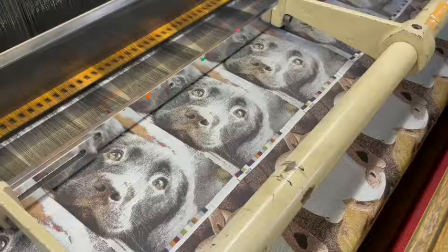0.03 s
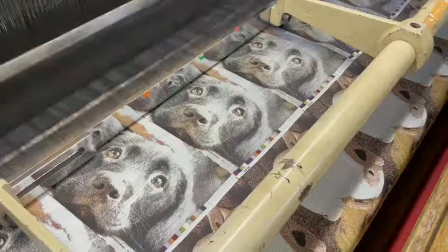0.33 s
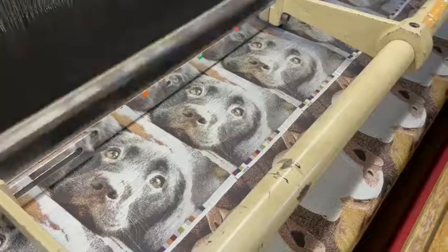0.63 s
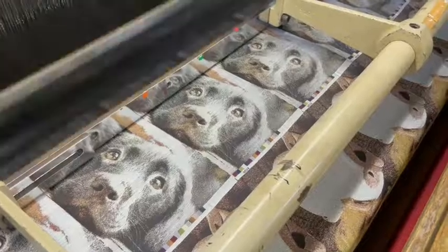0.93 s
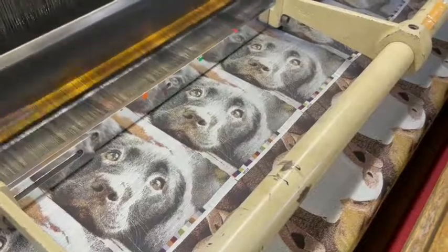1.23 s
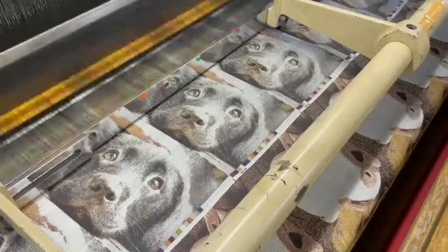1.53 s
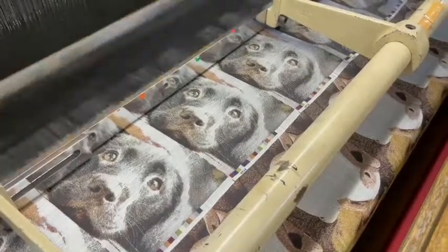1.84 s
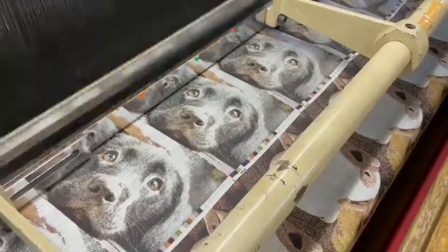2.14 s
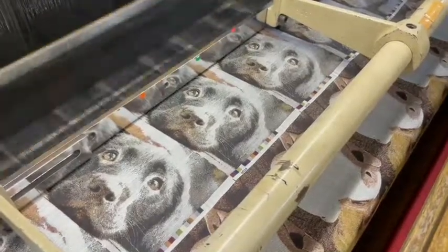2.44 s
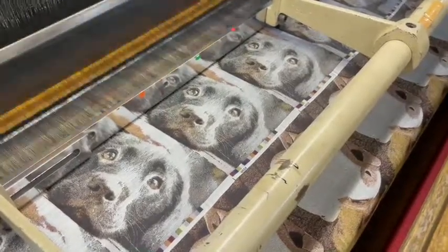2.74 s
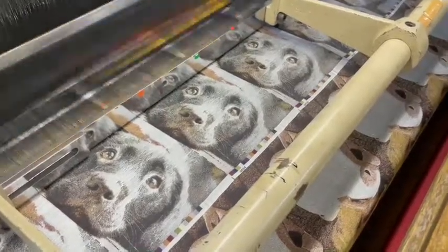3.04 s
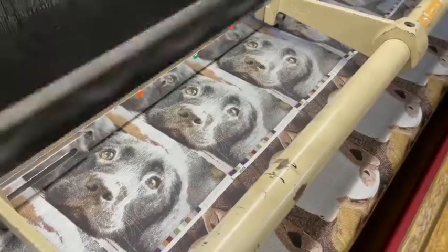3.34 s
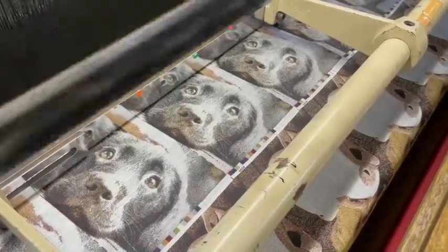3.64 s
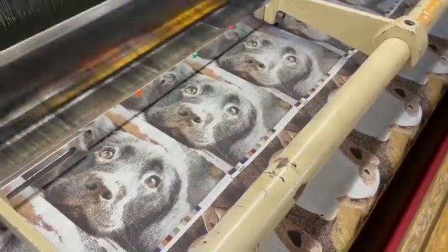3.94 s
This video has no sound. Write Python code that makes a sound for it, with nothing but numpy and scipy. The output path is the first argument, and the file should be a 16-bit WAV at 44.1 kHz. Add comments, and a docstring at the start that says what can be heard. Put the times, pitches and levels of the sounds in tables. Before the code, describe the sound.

Close up in a workshop full of machines, a weaving loom clashes and thumps in a quick, even rhythm amid rattling parts and brief whines. A second loom pounds, swishes and ticks, drifting in and out of step.

```python
"""A workshop full of machines, with a power loom weaving close by.
On every pick its drive whirrs up, the reed beats the weft home with a bright metallic clash and the
frame thumps. Heddles rattle, levers and cams knock, and now and then the drive whines.
A slightly slower loom nearby pounds, swishes and ticks, drifting in and out of step,
over the steady din of the hall."""
import sys
import numpy as np
from scipy import signal
from scipy.fft import rfft, irfft
from scipy.io import wavfile

SR = 44100
rng = np.random.default_rng(int(sys.argv[2]) if len(sys.argv) > 2 else 0)


def transcribe(signal):
    """Save signal, clipped to [-1, 1], as a 16-bit WAV file at the path in sys.argv[1]."""
    frames = np.atleast_2d(signal).T
    limited = np.clip(frames, -1, 1)
    pcm = np.round(limited * 32767).astype(np.int16)
    wavfile.write(sys.argv[1], SR, pcm)


N = 176400
T = np.arange(N) / SR
HZ = np.maximum(np.arange(N // 2 + 1) * SR / N, 1)


def from_db(db):
    return 10 ** (np.asarray(db) / 20)


def rms_one(x):
    return x / np.sqrt(np.mean(x ** 2) + 1e-20)


def per_hz(points):
    """A curve of (freq_hz, value) points, read on a log-frequency axis."""
    hz, value = np.transpose(points)
    return np.interp(np.log(HZ), np.log(np.maximum(hz, 1)), value)


def white():
    """Two unrelated noises: mid and side."""
    return rng.standard_normal((2, N))


def mid_only(x):
    """A sound that reaches both microphones along one path."""
    return np.array([x, np.zeros(N)])


def colour(x, eq):
    """Shape a signal with an EQ curve; rms 1."""
    return rms_one(irfft(rfft(x) * from_db(per_hz(eq)), N))


def resonance(hz, width_hz):
    """Response of a rounded peak; rms 1."""
    return rms_one(1 / (1 + ((HZ - hz) / width_hz) ** 2))


def drift(hz):
    """A random wobble, mostly slower than hz; rms 1."""
    return rms_one(irfft(rfft(rng.standard_normal(N)) / (1 + (HZ / hz) ** 2), N))


def strokes(times, levels_db, rise_s, hold_s, fall_s):
    """Envelope of strokes: a rounded rise up to each time, a hold and a dying fall; powers add."""
    power = np.zeros(N)
    for s, gain in zip(times, from_db(levels_db) * np.ones(len(times))):
        rise = (np.minimum(T - s, 0) / rise_s) ** 2
        fall = np.maximum(T - s - hold_s, 0) / fall_s
        power += (gain * np.exp(-np.minimum(rise + fall, 20))) ** 2
    return np.sqrt(power)


def clicks(per_s, spread_db):
    """Random contacts of uneven strength."""
    return (rng.random(N) < per_s / SR) * from_db(spread_db * np.minimum(rng.exponential(1, N), 4))


def ring(x, hz, t60_s):
    """A unit click sets a sine of height 1 ringing."""
    radius, angle = np.exp(-np.log(1000) / (t60_s * SR)), 2 * np.pi * hz / SR
    return signal.lfilter([0, np.sin(angle)], [1, -2 * radius * np.cos(angle), radius ** 2], x + 1e-18)


def struck(times, db, modes, scatter_s):
    """Each blow strikes each mode with a slightly different strength and timing."""
    out = np.zeros(N)
    for hz, mode_db, t60_s in modes:
        timing, force = rng.uniform(-0.96, 1, (len(times), 2)).T
        onsets = np.clip((times + scatter_s * timing) * SR, 0, N - 1).astype(int)
        blows = np.zeros(N)
        blows[onsets] = from_db(db + mode_db + 2 * force)
        out += ring(blows, hz, t60_s)
    return out


# Tone of the machine bed: freq_hz, gain_db
DIN_EQ = [(20, -21.0), (30, -4), (42, 3), (65, 1.5), (88, -10), (115, -3.5), (165, -4), (260, -3.5),
          (400, -7.5), (750, -5), (1150, -6), (1800, -11), (2550, -14.5), (3000, -15.5), (3600, -12.5),
          (4380, -10), (4700, -13), (4980, -12.5), (5550, -15), (6650, -12.5), (7400, -16.5), (8700, -37),
          (10500, -15.5), (12000, -20.5), (13200, -19.5), (14500, -27), (15800, -34)]
# Steel singing in the bed: pitch_hz, width_hz, level_db
STEEL_RINGS = [(99.7, 5.7, -44), (165.3, 18, -43), (2560, 100, -46), (3860, 35, -43), (4280, 140, -44),
               (4960, 66, -43), (6820, 130, -41.5), (15430, 120, -52)]

def hall():
    """Many machines blur into a fluttering din, and their shaking keeps steel parts ringing."""
    flutter_db = drift(hz=38.7)
    din = from_db(-24 + flutter_db) * colour(white(), DIN_EQ)
    shaking = rfft(white())
    steel = sum(from_db(db) * resonance(hz, width_hz) for hz, width_hz, db in STEEL_RINGS)
    return din + irfft(shaking * steel, N)


# Clatter of levers and cams: pitch_hz, rms_db
LINKAGE_PARTS = [(237, -51.5), (409, -49.5), (743, -43.5), (818, -43.5), (1098, -38.5), (1453, -43.5),
                 (1540, -49.5), (1880, -41), (1949, -46.5), (2304, -45), (2570, -43), (4393, -52),
                 (5373, -47)]
# The one lever that stands out: pitch_hz, gain_db, t60_s
LEVER_RING = [(1120, 7, 0.12), (1240, -1, .15), (1380, -9, .1)]

def linkage():
    """Levers and cams knock at random, each knock ringing about half the parts; one lever clanks out."""
    knocks = clicks(per_s=80, spread_db=1.2)
    clatter = np.zeros((2, N))
    for hz, db in LINKAGE_PARTS:
        blows = knocks * (rng.random(N) < .5) * white()
        clatter += from_db(db) * rms_one(ring(blows, hz, t60_s=.11))
    lever = struck(times=np.array([.977]), db=-23.5, modes=LEVER_RING, scatter_s=.00192)
    return clatter + mid_only(lever)


# The near loom's rhythm, with a fader per layer, for the drive here and the beat-up below:
# hit_s, clash_db, ping_db, clank_db, thump_db, whirr_db
PICKS = [(.1005,-18,-36,-31.5,-37,-27), (.446,-13.5,-27,-27,-40,-29), (.794,-16.5,-28,-27.5,-27,-27),
         (1.1416,-14.5,-22,-24,-29,-27), (1.4842,-16,-30,-32,-33,-29), (1.8342,-15,-32,-26.5,-24,-26),
         (2.181,-19,-40,-31,-32,-26), (2.526,-16,-25,-29,-27,-31), (2.875,-18.5,-34,-30,-37,-30),
         (3.2205,-17.5,-24,-26,-27,-31), (3.566,-19,-28,-26.5,-27,-28.5), (3.91,-19,-24,-29,-28,-26.5)]
# Tone of the whirr and of the rattle: freq_hz, gain_db
WHIRR_EQ = [(100, -18), (300, -9), (600, 4), (1150, 1), (1800, -6), (3000, -16), (4500, -1), (7000, -26),
            (13000, -8.5), (16000, -29)]
RATTLE_EQ = [(200, -8), (700, 8), (1500, 5.5), (3000, -6.5), (4400, -0.5), (5600, -9.5), (6700, 5),
             (9000, -31), (13000, -0.5), (16000, -16)]

def drive():
    """The drive whirrs up just before each beat, and heddles and chains rattle harder with it."""
    hit_s, *_, whirr_db = np.transpose(PICKS)
    swell = strokes(hit_s - .024, whirr_db, rise_s=.091, hold_s=0, fall_s=.059)
    contacts = clicks(per_s=420, spread_db=2)
    contact_fall_s = .0016
    contact_power = signal.lfilter([1], [1, -np.exp(-1 / (contact_fall_s * SR))], contacts ** 2 + 1e-18)
    shaking = 1 + .42 * swell / swell.max()
    rattle = colour(white() * np.sqrt(contact_power) * shaking, RATTLE_EQ)
    return swell * colour(white(), WHIRR_EQ) + from_db(-32) * rattle


def reed_blows(hit_s, db):
    """Envelope of the reed's hits, each with a softer rebound and a tail."""
    rebound_s, rebound_db = hit_s + .018, db - 7
    hits = strokes(np.r_[hit_s, rebound_s], np.r_[db, rebound_db], rise_s=.004, hold_s=.0048, fall_s=.012)
    tail = strokes(hit_s, db - 5, rise_s=.004, hold_s=0, fall_s=.034)
    return np.hypot(hits, tail)


# Tone of the bright clash and of the midrange clank: freq_hz, gain_db
CLASH_EQ = [(300, -17), (1500, -8.5), (3100, -21), (4500, -11), (6000, -2.5), (9000, -3), (11500, 1.5),
            (12700, -16), (14300, -1), (15700, -9)]
CLANK_EQ = [(150, -23), (400, -2.5), (1000, -8), (1700, -0.5), (2300, 0), (3000, -6), (4500, -16),
            (7000, -8), (10000, -29)]
# Ring-out of the reed, the sley (the bar that carries it) and the frame: pitch_hz, gain_db, t60_s
REED_RING = [(8200, -3, 0.13), (10500, -14, .05), (15430, -19, .06)]
SLEY_RING = [(1880, -12, .12), (2080, -1, .1), (2256, -5, 0.15), (2430, -12, .15)]
FRAME_RING = [(44.4, -6, .35), (53, -2.5, 0.6), (101, -9, .15), (169, -4.5, 0.17)]

def beat_up():
    """The reed hits the cloth: its wires clash and ping, the sley clanks and the frame thumps."""
    hit_s, clash_db, ping_db, clank_db, thump_db, _ = np.transpose(PICKS)
    wires = colour(white() * clicks(per_s=9000, spread_db=-2.5), CLASH_EQ)
    clash = from_db(-6) * reed_blows(hit_s, clash_db) * wires
    ping = reed_blows(hit_s, ping_db) * irfft(rfft(white()) * resonance(hz=13550, width_hz=450), N)
    clank = strokes(hit_s, clank_db + 2, rise_s=.004, hold_s=0, fall_s=.039) * colour(white(), CLANK_EQ)
    reed = struck(hit_s, clash_db, REED_RING, scatter_s=.0043)
    sley = struck(hit_s, clank_db, SLEY_RING, scatter_s=.00212)
    frame = struck(hit_s, thump_db, FRAME_RING, scatter_s=.0033)
    return clash + ping + clank + mid_only(reed + sley + frame)


# Accents on top of the clatter: start_s, pitch_hz, peak_db
HARD_KNOCKS = [(.104,2500,-31), (.452,2325,-26), (.672,484,-24), (1.194,2320,-26), (1.16,53,-22),
               (1.541,63.4,-23), (1.822,490,-23), (1.938,2250,-32), (2.18,166,-27), (2.237,172,-22.5),
               (2.25,64,-24), (2.324,163,-23.5), (2.643,185,-23), (2.646,1895,-25), (2.968,1916,-30),
               (2.878,2270,-26), (3.29,435,-23), (3.355,354,-25), (3.39,63.6,-35), (3.765,162,-25.5),
               (3.83,167,-31)]

def loud_knocks():
    """Single cams and frame members are struck hard and ring briefly at their own pitch."""
    out = np.zeros(N)
    for start_s, hz, db in HARD_KNOCKS:
        blow = from_db(db) * (np.arange(N) == int(start_s * SR))
        out += ring(blow, hz, t60_s=.19)
    return mid_only(out)


# The slower loom's rhythm: hit_s, pound_db, rumble_db, swish_db
SLOW_STROKES = [(.305,-28,-28,-27.5), (0.686,-32,-32.5,-30.5), (1.042,-40,-33.5,-29.5),
                (1.452,-27.5,-35,-25.5), (1.834,-34,-30,-30.5), (2.199,-29.5,-35,-29),
                (2.569,-26.5,-37,-27.5), (2.98,-33,-32.5,-25.5), (3.361,-29,-36,-28.5), (3.744,-31,-35,-29)]
# Its sharp accents: hit_s, level_db
SLOW_TICKS = [(0.6749, -27.5), (0.7552, -28), (1.3369, -30), (1.7903, -30), (2.596, -26.5), (2.6804, -26.5),
              (3.031, -33), (3.0614, -27), (3.3608, -27), (3.444, -26.5), (3.7404, -31), (3.824, -25.5)]
# Tone of its rumble, swish and ticks: freq_hz, gain_db
RUMBLE_EQ = [(40, -20), (100, -11), (165, 6.5), (260, -2), (500, 6), (750, -8), (1500, -31)]
SWISH_EQ = [(150, -4), (400, -0.5), (750, -5.5), (1150, 0), (1700, -2.5), (3000, -10), (6000, -14),
            (12000, -44)]
TICK_EQ = [(1000, 7), (3000, 11.5), (4500, 4), (7000, -30), (10000, 18), (13300, -2), (16000, 0)]

def slower_loom():
    """The loom nearby: a swish, then a deep pound with a rumble, and small metallic ticks."""
    hit_s, pound_db, rumble_db, swish_db = np.transpose(SLOW_STROKES)
    pound = np.zeros(N)
    for s, db in zip(hit_s, pound_db):
        detune, phase = rng.uniform(-0.98, 1, 2)
        pitch_hz = 69.2 * (1 + .13 * detune)
        tone = np.sin(2 * np.pi * (pitch_hz * (T - s) + phase))
        pound += strokes([s], db, rise_s=.036, hold_s=.0091, fall_s=.12) * tone
    rumble = strokes(hit_s, rumble_db, rise_s=.036, hold_s=.042, fall_s=.082) * colour(white(), RUMBLE_EQ)
    swish_swell = strokes(hit_s - .081, swish_db, rise_s=.038, hold_s=.093, fall_s=.17)
    swish = swish_swell * colour(white(), SWISH_EQ)
    tick_s, tick_db = np.transpose(SLOW_TICKS)
    ticks = strokes(tick_s, tick_db + 2.5, rise_s=.0049, hold_s=0, fall_s=.019) * colour(white(), TICK_EQ)
    return mid_only(pound) + rumble + swish + ticks


# Short, grainy glides: start_s, length_s, from_hz, to_hz, level_db
WHINE_GLIDES = [(.28, 0.092, 1510, 1273, -34), (.97, .13, 1110, 1578, -34), (2.1, .1, 1380, 1556, -32)]

def whines():
    """A narrow, rough resonance slides as the drive changes speed."""
    out = np.zeros((2, N))
    roughness = np.array([drift(hz=45) + 1j * drift(hz=45) for _ in range(2)])
    for start_s, length_s, from_hz, to_hz, db in WHINE_GLIDES:
        pitch_hz = np.interp(T, [start_s, start_s + length_s], [from_hz, to_hz])
        tone = np.real(roughness * np.exp(2j * np.pi * np.cumsum(pitch_hz) / SR))
        out += strokes([start_s], db, rise_s=.025, hold_s=length_s, fall_s=.025) * tone
    return out


# How alike left and right are: freq_hz, coherence
STEREO_LIKENESS = [(60, .97), (140, .88), (220, .77), (330, .53), (550, .17), (1200, .24), (1800, .14),
                   (2700, .42), (4200, .3), (5500, .2), (6600, .35), (7150, .3), (7700, .9), (8600, .99),
                   (9400, .99), (10200, .75), (11200, .6), (12400, .98), (16000, .99)]
# Phase between the sides: freq_hz, left_lead_rad
STEREO_PHASE = [(0, 0), (1380, -2.0), (2580, 0.5), (3010, 0.6), (4910, 0.5), (5680, -1.7), (6630, -0.7),
                (7320, -3.0), (10200, -3.3), (10700, -3.9), (11900, -6.2), (16200, -6.3)]
# Balance: freq_hz, left_over_right_db
STEREO_BALANCE = [(60, 0.5), (120, 1.0), (240, 1.0), (480, 1.0), (950, 0.5), (1890, 0.5), (3770, 3.0),
                  (7520, 1.0), (15000, 0.0)]

def microphones(mid_side):
    """A microphone pair: mid and side become left and right; width, phase and balance vary with pitch."""
    mid, side = rfft(mid_side)
    alike = per_hz(STEREO_LIKENESS)
    mid, side = mid * np.sqrt((1 + alike) / 2), side * np.sqrt((1 - alike) / 2)
    lean = from_db(per_hz(STEREO_BALANCE) / 2)
    lead_rad = np.interp(HZ, *np.transpose(STEREO_PHASE))
    left = (mid + side) * lean
    right = (mid - side) / lean * np.exp(-1j * lead_rad)
    return irfft(np.array([left, right]), N)


def scene():
    """Both looms over the hall bed, in stereo."""
    return microphones(hall() + beat_up() + drive() + linkage() + slower_loom() + whines() + loud_knocks())


def record(dry):
    """The sound cuts in just after the start; the deepest bass and the top are cut."""
    open_s, low_cut_hz, stopband_hz = .072, 42, 16300
    gate = np.clip((T - open_s) / .002, from_db(-60), 1)
    thinned = signal.sosfilt(signal.butter(4, low_cut_hz, "high", fs=SR, output="sos"), dry)
    return signal.sosfilt(signal.cheby2(20, 70, stopband_hz, fs=SR, output="sos"), thinned * gate)


dry = scene()
out = record(dry)
transcribe(out)
```